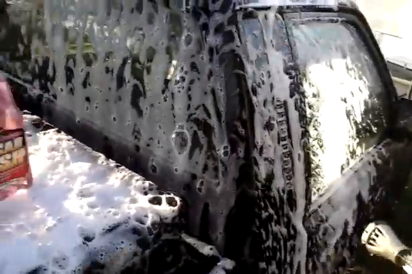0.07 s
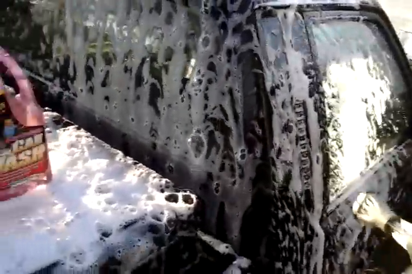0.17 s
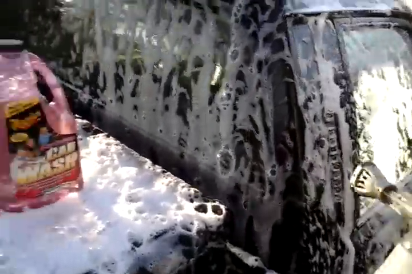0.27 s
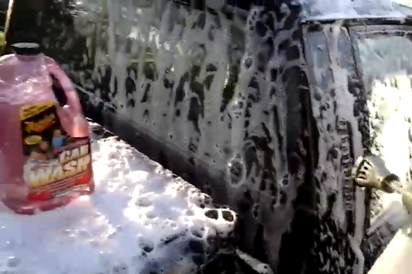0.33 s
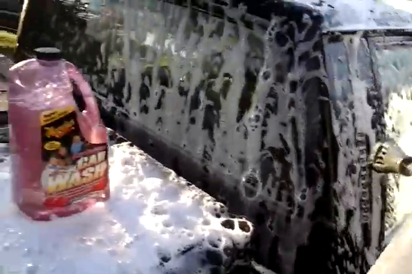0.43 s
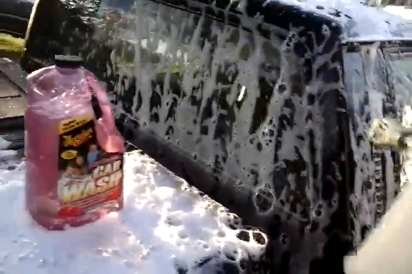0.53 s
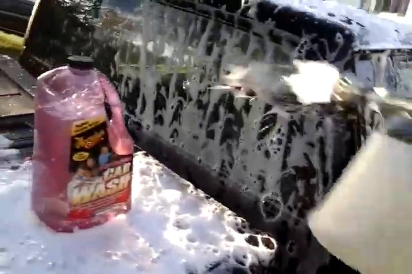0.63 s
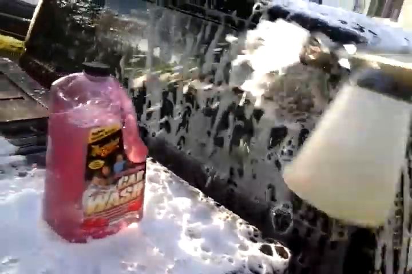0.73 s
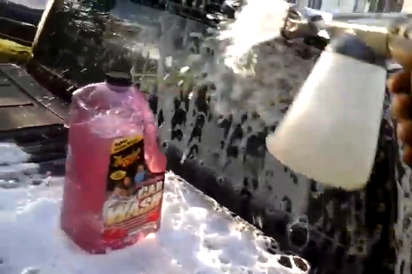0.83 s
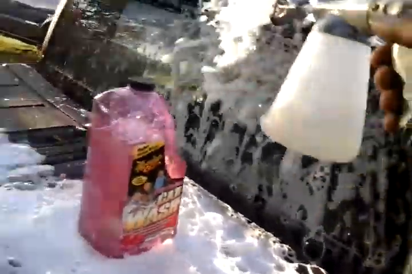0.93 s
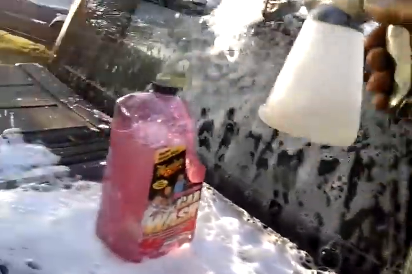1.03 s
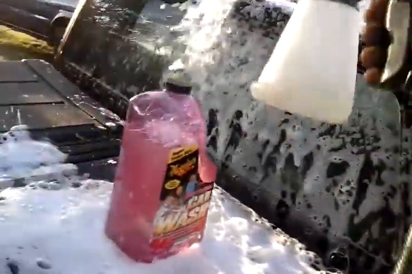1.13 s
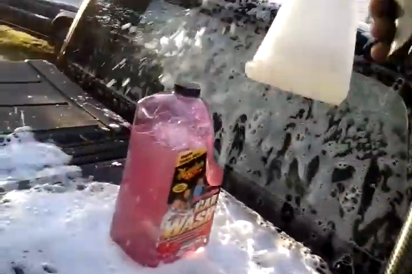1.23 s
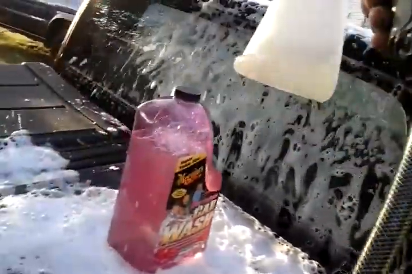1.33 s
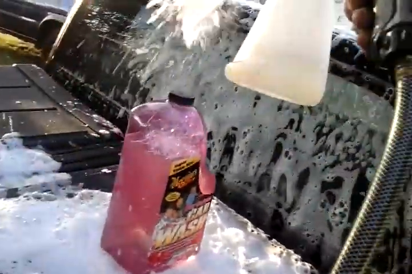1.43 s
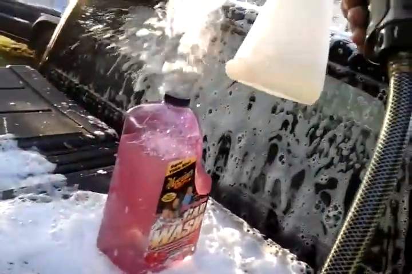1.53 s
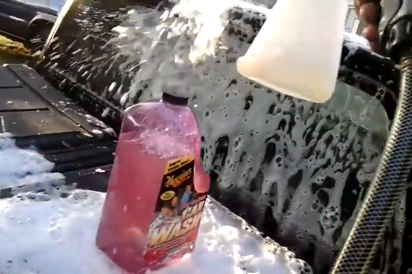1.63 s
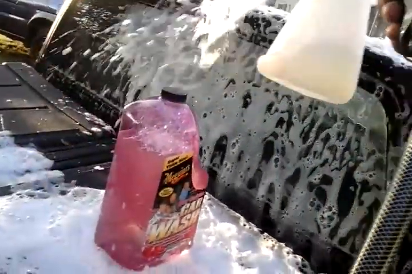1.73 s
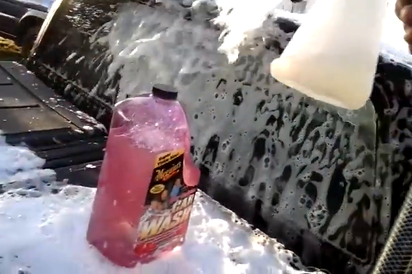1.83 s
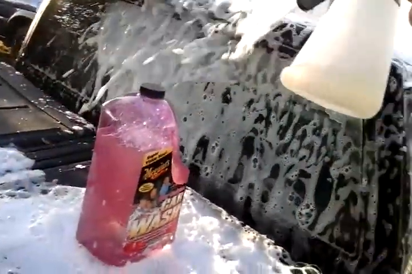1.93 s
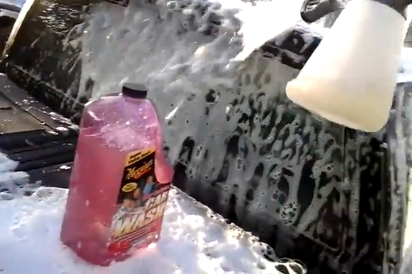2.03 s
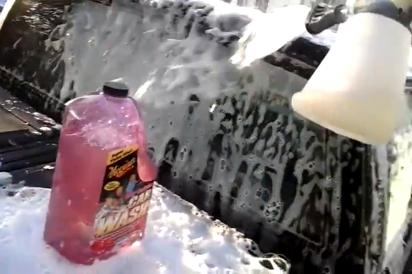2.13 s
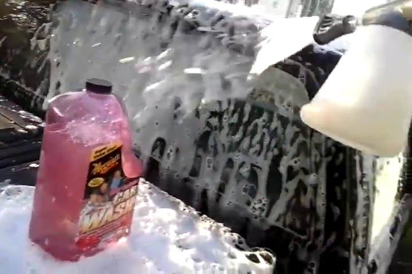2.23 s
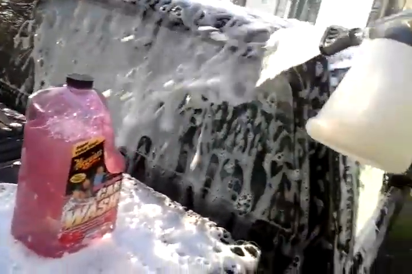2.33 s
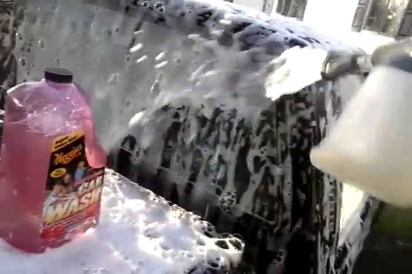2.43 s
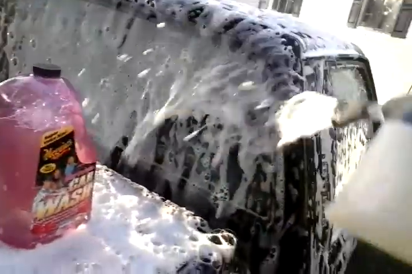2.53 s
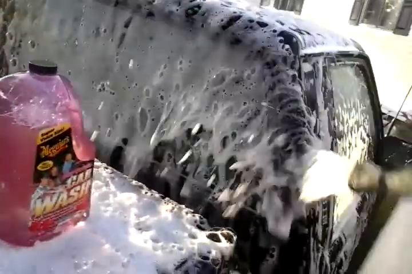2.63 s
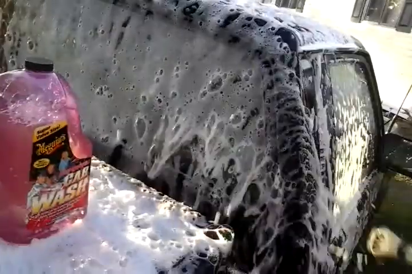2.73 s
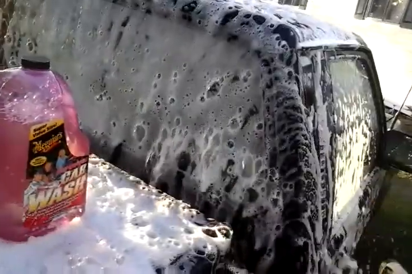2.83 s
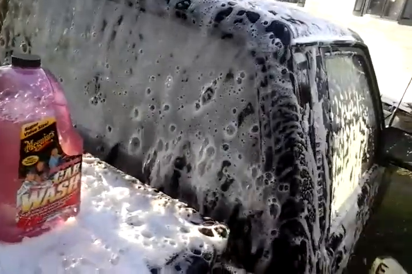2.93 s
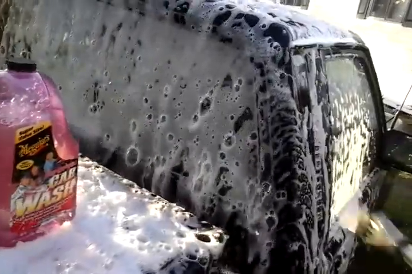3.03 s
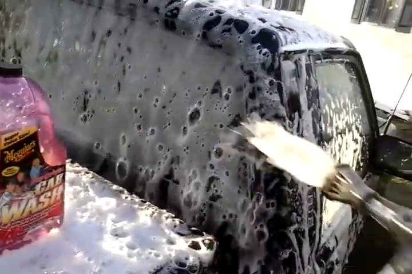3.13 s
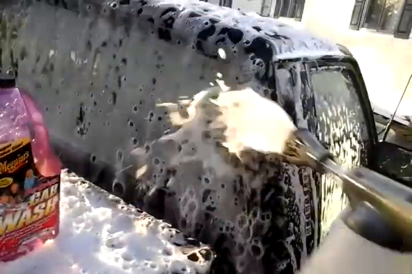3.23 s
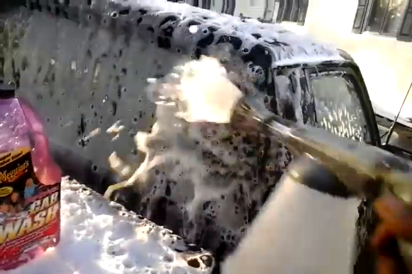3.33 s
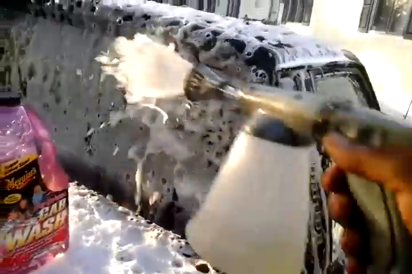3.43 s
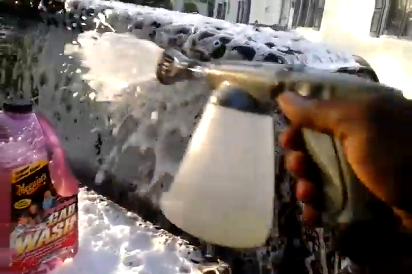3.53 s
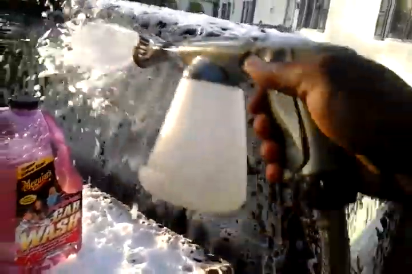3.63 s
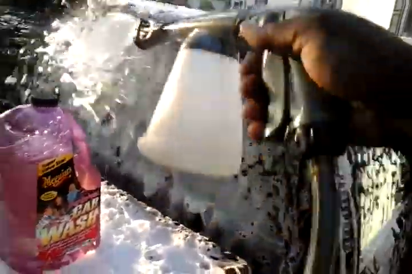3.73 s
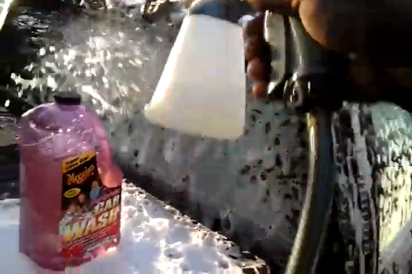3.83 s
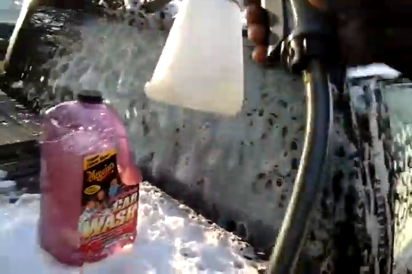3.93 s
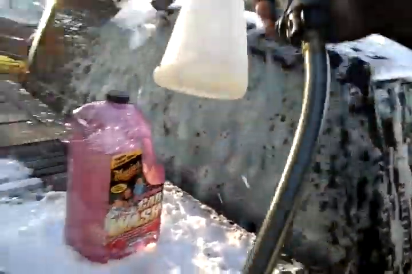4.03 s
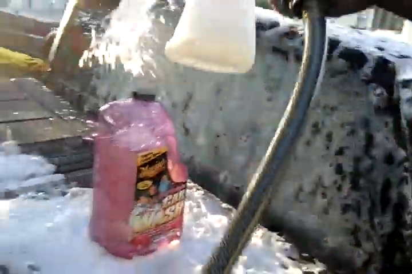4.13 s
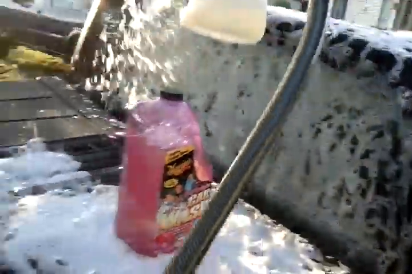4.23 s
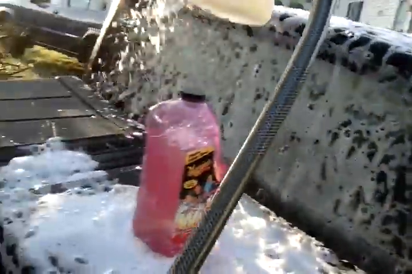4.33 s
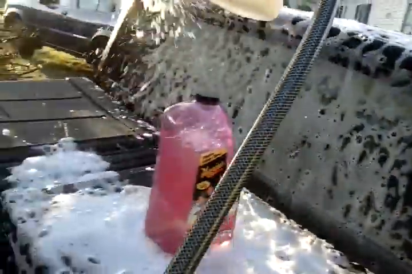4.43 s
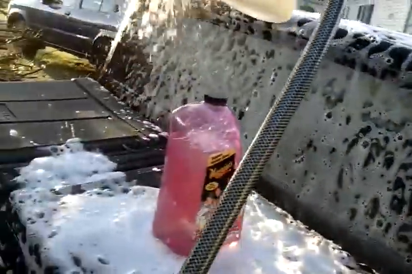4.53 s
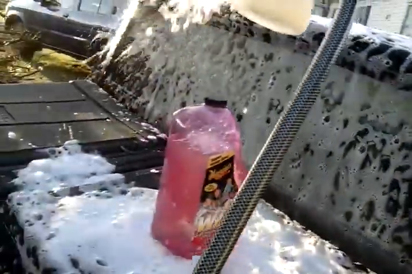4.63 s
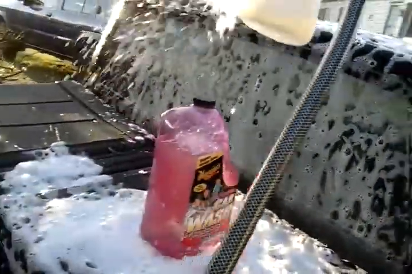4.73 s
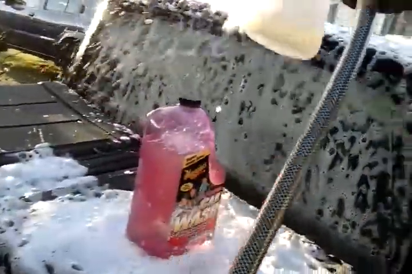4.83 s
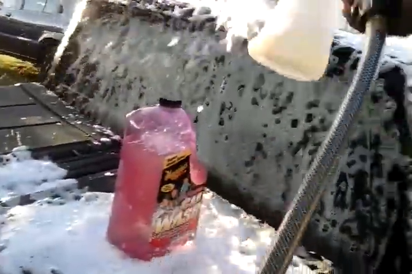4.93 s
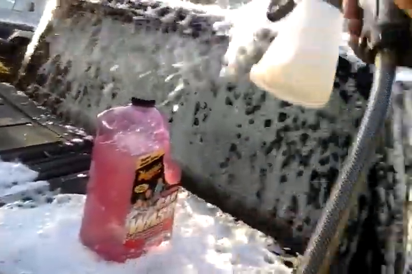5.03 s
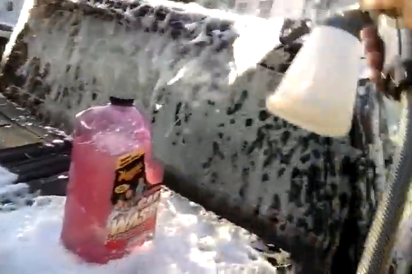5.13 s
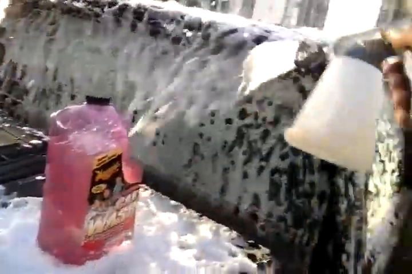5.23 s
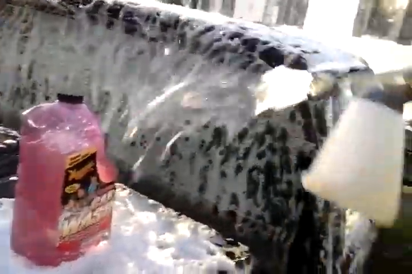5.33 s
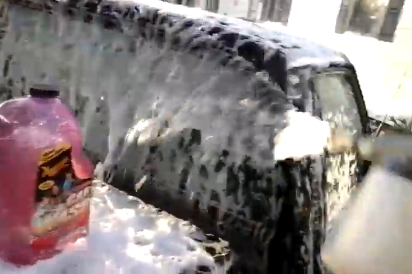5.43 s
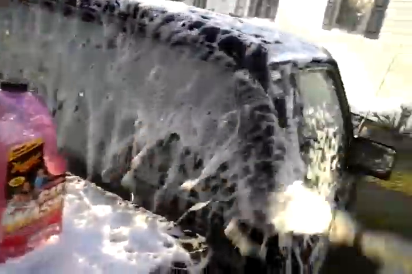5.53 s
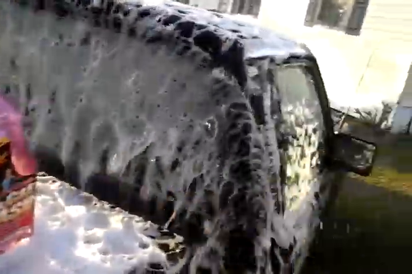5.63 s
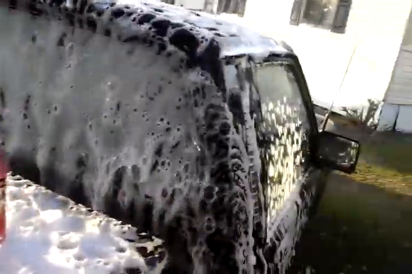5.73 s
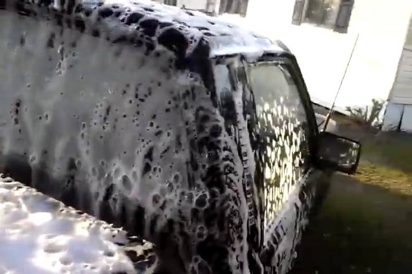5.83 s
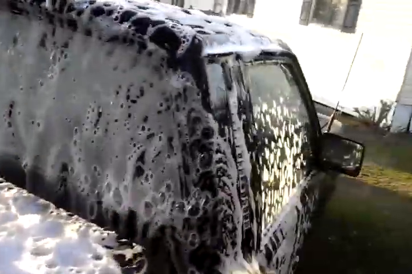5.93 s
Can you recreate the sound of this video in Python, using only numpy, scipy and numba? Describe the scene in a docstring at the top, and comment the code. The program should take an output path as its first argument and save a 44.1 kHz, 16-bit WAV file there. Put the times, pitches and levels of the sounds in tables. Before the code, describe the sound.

A foam gun on a hose sprays a vehicle outdoors. After a moment of soft fizzing suds, the trigger snaps, air spits out and a bright hiss begins, shifting in tone as the gun sweeps past. Four bursts, alternately short and long, start and stop with sharp clicks, and a fifth begins at the very end. Suds fizz and drip in the pauses, while a breeze thumps on the microphone, mostly on the left.

```python
"""A hose-end foam gun is squeezed five times beside a soapy vehicle, heard at two unlike microphone ports.
First, eddies of a breeze thump mostly on the left port while suds fizz and drip, and a thin whistle sounds.
At 0.6 s the valve snaps, ringing the gun's modes; the barrel spits air and the turbulent jet hisses,
its colour shifting by interference with a panel echo as the gun sweeps past. Suds fizz in each pause,
joined in the second by a faint hollow hiss. The fifth squeeze begins just before the end."""
import sys
import numpy as np
from scipy import signal
from scipy.io import wavfile
from numba import njit

SR = 44100
rng = np.random.default_rng(int(sys.argv[2]) if len(sys.argv) > 2 else 0)


def log_audio(samples):
    """Write samples as a 16-bit WAV file to the path given in sys.argv[1]."""
    # one column per channel
    frames = np.atleast_2d(samples).T
    # limit to full scale, then quantise
    limited = np.clip(frames, -1, 1)
    pcm = np.round(limited * 32767).astype(np.int16)
    wavfile.write(sys.argv[1], SR, pcm)


N = 263806
T = np.arange(N) / SR


def amp(db):
    """Decibels as an amplitude ratio."""
    return 10 ** (np.asarray(db) / 20)


def unit_rms(x):
    """Normalisation to unit power."""
    return x / np.sqrt(np.mean(x ** 2) + 1e-20)


def in_time(rows):
    """Linear interpolation of each column over the times in the first."""
    times_s, *columns = np.transpose(rows)
    return [np.interp(T, times_s, column) for column in columns]


def gate(start_s, end_s, rise_s, fall_s):
    """Trapezoidal envelope: rises from start_s, falls from end_s."""
    return np.clip(np.minimum((T - start_s) / rise_s, (end_s - T) / fall_s + 1), 0, 1)


def decay(start_s, fade_s):
    """Exponential decay from 1, silent before start_s."""
    return (T >= start_s) * np.exp(-np.abs(T - start_s) / fade_s)


def panned(pan_db):
    """Constant-power gains for a level difference, left minus right."""
    left = amp(np.atleast_1d(pan_db))
    return np.array([left, np.ones_like(left)]) * np.sqrt(2 / (1 + left ** 2))


def drift(corner_hz):
    """Low-pass random fluctuation of unit variance."""
    pole = np.exp(-40 * np.pi * corner_hz / SR)
    slow = signal.lfilter([1], [1, -2 * pole, pole * pole], rng.standard_normal(N // 20 + 2002))[2000:]
    return np.interp(np.arange(N) / 20, np.arange(len(slow)), unit_rms(slow - slow.mean()))


def band(x, low_hz, high_hz):
    """Butterworth band-pass."""
    return signal.sosfilt(signal.butter(2, [low_hz, high_hz], "band", fs=SR, output="sos"), x)


@njit
def resonate(x, hz, radius):
    """Two-pole resonator with a moving centre and unit peak gain."""
    out = np.zeros(len(x))
    for i in range(2, len(x)):
        feedback = 2 * radius * np.cos(2 * np.pi / SR * hz[i]) * out[i - 1] - radius ** 2 * out[i - 2]
        out[i] = (1 - radius ** 2) / 2 * (x[i] - x[i - 2]) + feedback
    return out


def lift(x, hz, width_hz, gain_db):
    """Resonant peak, or a dip if the gain is negative."""
    return x + (amp(gain_db) - 1) * resonate(x, hz * np.ones(N), np.exp(-np.pi * width_hz / SR))


def delayed(x, ms):
    """Propagation delay."""
    return np.interp(T - ms / 1000, T, x)


def ring(force, hz, t60_s):
    """Damped oscillator: a unit impulse starts a sine of height 1."""
    radius, step = amp(-60 / (t60_s * SR)), 2 * np.pi * hz / SR
    return signal.lfilter([0, np.sin(step)], [1, -2 * radius * np.cos(step), radius ** 2], force + 1e-18)


def coloured(white, spectrum, waver_db, tilt_db=lambda hz: 0):
    """Spectral shaping: two noises feed alternate quarter-octave bands, each wavering in level."""
    out, edges_hz = 0, 300 * 2 ** np.arange(0, 5.8, .25)
    points_hz, level_db = np.transpose(spectrum)
    for k, (low, high) in enumerate(zip(edges_hz, edges_hz[1:])):
        hz = np.sqrt(low * high)
        gain_db = np.interp(np.log(hz), np.log(points_hz), level_db) + tilt_db(hz) + waver_db * drift(3.2)
        out = out + np.repeat(amp(gain_db[::16]), 16)[:N] * band(white[k % 2], low, high)
    return out


def grains(per_s, spread_db, shape):
    """Shot noise: random impulses of uneven size and sign."""
    sizes = amp(spread_db * np.minimum(rng.exponential(1, shape), 5)) * rng.choice([-1, 1], shape)
    return unit_rms(sizes * (rng.random(shape) < per_s / SR))


def street():
    """Band-limited noise: the steady low rumble of the street."""
    return amp(-62) * unit_rms(band(rng.standard_normal((2, N)), 170, 1240))


# Spectrum of the fizz: frequency_hz, level_db
SUDS_SPECTRUM = [(300, -13), (700, -1.5), (1500, -0.5), (2500, -0.5), (4000, -2.5), (6000, -4.5),
                 (8000, -4), (10500, -10), (14500, -15)]
# Suds while the valve is shut (a negative fade swells): start_s, level_db, fade_db_per_s
PAUSES = [(0, -47, 26.5), (1.15, -46.5, -21), (2.73, -43.5, 21), (3.768, -41.5, 36), (5.59, -39, 105)]

def suds():
    """Shot noise of bursting bubbles over a soft hiss, louder as the last foam of a squeeze lands."""
    splash_db, rest_db, under_jet_db = 9, -57.5, -41.5
    bursts = amp(-2) * grains(per_s=900, spread_db=4, shape=(2, 2, N))
    fizz = coloured(bursts + rng.standard_normal((2, 2, N)), SUDS_SPECTRUM, waver_db=3)
    level_db = np.zeros(N)
    for start_s, start_db, fade_db_per_s in PAUSES:
        landing_db = splash_db * decay(start_s, .033) * (start_s > 0)
        level_db = np.where(T >= start_s, start_db - fade_db_per_s * (T - start_s) + landing_db, level_db)
    valve = valve_opening()
    return unit_rms(fizz) * ((1 - valve) * amp(np.maximum(level_db, rest_db)) + valve * amp(under_jet_db))


# Breeze over the left port: time_s, level_db
BREEZE = [(0, -37.5), (.12, -43), (.3, -64), (.6, -51), (.68, -22.5), (.97, -30.5), (1.3, -37.5),
          (1.45, -39.5), (1.95, -35.5), (2.06, -28), (2.68, -34), (2.82, -44), (3.15, -40), (3.36, -36),
          (3.42, -51), (3.62, -51), (3.73, -41), (4.1, -70), (4.3, -44.5), (4.55, -52.5), (4.85, -63),
          (5.1, -31.5), (5.25, -39.5), (5.4, -47), (5.65, -32), (5.85, -59), (5.98, -59)]

def wind():
    """Turbulent pressure, independent at each port; every buffet leaves a wake on the left."""
    wake_db, wake_s, sharp_db_per_octave = -6, .03, 10
    start_s, buffet_db, pitch_hz = np.transpose(BUFFETS)
    kicks, onsets = np.zeros((2, N)), (start_s * SR).astype(int)
    kicks[0, onsets] = amp(buffet_db + wake_db)
    # quicker buffets leave sharper wakes
    kicks[1, onsets] = kicks[0, onsets] * amp(sharp_db_per_octave * np.log2(pitch_hz / 200))
    wakes = signal.lfilter([1], [1, -np.exp(-1 / (wake_s * SR))], kicks)
    left, left_sharp = np.hypot(amp(in_time(BREEZE)[0]), wakes)
    right = amp(-54.5 + 2.5 * drift(4.2))    # the sheltered port
    level, sharp_level = np.array([left, right]), np.array([left_sharp, right])
    lumps, white = np.array([drift(52), drift(55)]), rng.standard_normal((3, 2, N))
    thump = level * unit_rms(band(white[0], 100, 317) * amp(3.9 * lumps))
    sharp = sharp_level * unit_rms(band(white[1], 280, 674) * amp(5.9 * lumps))
    sway = np.hypot(amp(-57.5 + 3.6 * drift(8)), amp(-10.5) * level)
    heave = sway * unit_rms(band(white[2], 37, 105))
    return thump + amp(-14) * sharp + heave


# Hardest blows of the wind on the left port: start_s, level_db, pitch_hz
BUFFETS = [(0.086, -31, 158), (0.671, -13.5, 304), (0.72, -17.5, 170), (0.759, -21, 209), (0.811, -25, 164),
           (0.879, -25, 163), (0.902, -12, 377), (0.949, -21, 223), (1.028, -21, 142), (1.059, -23, 364),
           (1.115, -24.5, 106), (1.198, -40, 248), (1.514, -22, 275), (1.607, -29, 151),
           (1.687, -15.5, 191), (1.719, -21, 230), (1.757, -23, 187), (1.979, -29, 114), (2.019, -14, 326),
           (2.264, -20, 183), (2.344, -30, 205), (2.388, -29.5, 109), (2.439, -37, 213), (2.483, -25, 183),
           (2.574, -21, 182), (2.632, -20.5, 160), (2.965, -20.5, 200), (3.139, -28, 127),
           (3.212, -23, 193), (3.324, -24, 370), (3.35, -27, 182), (5.062, -26, 121), (5.108, -25.5, 135),
           (5.205, -31, 143), (5.479, -28, 230), (5.528, -25.5, 94.2), (5.62, -22, 236),
           (5.689, -24.5, 159), (5.751, -31, 148), (5.924, -29, 195)]

def buffets():
    """Transient response: each blow gives the left diaphragm a heavily damped swing."""
    out = np.zeros((2, N))
    for (start_s, level_db, pitch_hz), sign in zip(BUFFETS, rng.choice([-1, 1], len(BUFFETS))):
        cycles, at = T[:SR // 20] * pitch_hz, round(start_s * SR)
        envelope = 4.28 * amp(level_db) * cycles * np.exp(-1.3 * cycles)
        out[0, at:at + len(cycles)] += sign * envelope * np.sin(2 * np.pi * cycles)
    return out


# Single drops landing: start_s, peak_db, pitch_hz, pan_db
DROPS = [(0.1274, -27, 3540, 11), (0.2942, -46.5, 5840, 6), (0.3461, -39, 5720, 4.5),
         (1.2194, -31, 5840, 14), (2.989, -27, 4050, 11), (3.8346, -28, 5360, 3), (3.93, -32, 5090, -3),
         (3.9594, -45, 4780, 3), (5.7215, -27, 4700, 3), (5.886, -18, 7200, 7), (5.8906, -33, 5850, 7)]

def drops():
    """Impact noise: each drop is a short splat, strongest around its pitch."""
    out, length = np.zeros((2, N)), round(.012 * SR)
    for start_s, peak_db, pitch_hz, pan_db in DROPS:
        impact = rng.standard_normal((2, length)) * np.exp(-T[:length] / .0009)
        splat = band(impact, .66 * pitch_hz, 1.13 * pitch_hz) + amp(-15.5) * band(impact, 2000, 12000)
        at = round(start_s * SR)
        out[:, at:at + length] += amp(peak_db) * splat / np.abs(splat).max() * panned(pan_db)
    return out


# Faint whistle before the first squeeze: time_s, pitch_hz, level_db
WHISTLE = [(0.47, 7214, -71), (0.484, 7330, -59), (0.53, 6900, -58), (0.6, 7200, -64.5)]

def whistle():
    """Random frequency and amplitude modulation make a thin tone breathy."""
    pitch_hz, level_db = in_time(WHISTLE)
    tone = np.sin(2 * np.pi * np.cumsum(pitch_hz + 60 * drift(120)) / SR)
    envelope = amp(level_db + 3 * drift(43)) * gate(WHISTLE[0][0], WHISTLE[-1][0], .01, .005)
    return tone * envelope * panned(4)


# Modes of the gun: pitch_hz, level_db, t60_s
GUN_MODES = [(1340, -18, .01), (2330, -3, 0.024), (2506, 6, 0.012), (3140, 0.5, 0.019), (4940, 7.5, 0.0063),
             (5610, 3, 0.0099), (7000, -8, .006), (8850, -16, .006), (11300, -22, .005)]
# Valve and trigger snaps: start_s, peak_db, favoured_hz, upper_modes_db, pan_db
SNAPS = [(0.599, -30, 2250, -20, 10), (0.6078, -10, 3250, -12, 11), (1.137, -20, 2240, -9, 17.5),
         (1.1422, -3.5, 2500, -13.5, 1.5), (1.348, -25, 2280, -8, 17), (2.7134, -33, 2000, -7, -10.5),
         (2.7202, -7.5, 2280, 0, 6), (3.0881, -6, 2500, -24, 8), (3.0914, -9.5, 2920, -15, -1),
         (3.17, -7, 3070, 0, -2), (3.176, -15, 2440, 2, 9.5), (3.7607, -15, 2830, -1, 28.5),
         (3.7662, -10.5, 3000, 3, -18), (4.023, -25, 2960, 4, 14), (5.5841, -8, 2970, 2, 0),
         (5.94, -4.5, 3200, -4, -1.5)]

def snaps():
    """Modal ringing: a brief rattle excites the gun, its lower modes most near the favoured pitch."""
    out, length, left_lag = np.zeros((2, N)), round(.03 * SR), 13    # samples
    for start_s, peak_db, favoured_hz, upper_db, pan_db in SNAPS:
        rattle = band(rng.standard_normal(length) * np.exp(-T[:length] / .00061), 980, 15500)
        snap = 0
        for hz, mode_db, t60_s in GUN_MODES:
            drive_db = upper_db if hz > 4000 else -28 * abs(np.log2(hz / favoured_hz))
            snap = snap + amp(mode_db + drive_db) * ring(rattle, hz, t60_s)
        at = round(start_s * SR)
        snap = (amp(peak_db) * snap / np.abs(snap).max())[:N - at - left_lag]
        for port, onset, gain in zip(out, (at + left_lag, at), panned(pan_db)):
            port[onset:onset + len(snap)] += gain * snap
    return out


# Air spat out as water arrives: start_s, level_db, hold_s
SPITS = [(0.601, -25.5, .045), (3.085, -25.5, .006), (5.932, -37, .05)]

def spits():
    """Filtered shot noise: dense crackles ring in the barrel."""
    fade_db_per_s = 600
    crackle = grains(per_s=2800, spread_db=4.9, shape=N)
    barrel = unit_rms(band(crackle, 1550, 3530) + amp(-8) * band(crackle, 2700, 10000))
    envelope = 0
    for start_s, level_db, hold_s in SPITS:
        attack = np.clip((T - start_s) / .0032, 0, 1)
        envelope = envelope + attack * amp(level_db - fade_db_per_s * np.maximum(T - start_s - hold_s, 0))
    return paths(barrel * envelope) * amp([[0], [-4]])


# Squeezes of the trigger: open_s, close_s, rise_s, surge_db
SQUEEZES = [(0.604, 1.142, 0.035, 9), (1.348, 2.72, 0.018, 2), (3.089, 3.764, .022, 4.5),
            (4.028, 5.579, .014, 0.5), (5.94, 6.202, 0.019, 0)]

def valve_opening():
    """The valve gates the flow: 0 shut, 1 open."""
    return sum(gate(open_s, close_s, rise_s, fall_s=.012) for open_s, close_s, rise_s, _ in SQUEEZES)


# Spectrum of the jet: frequency_hz, density_db
JET_SPECTRUM = [(300, -19), (600, -1.5), (1000, -5), (1800, -7), (2500, 1.5), (4000, -2.5), (5500, 0.5),
                (6700, -5.5), (7500, -12), (10000, -8), (12000, -11), (13300, -38), (14400, -7.5)]
# Resonances of the nozzle: centre_hz, width_hz, gain_db
NOZZLE_RESONANCES = [(2980, 380, 5), (6700, 350, 6), (8400, 280, 5), (11200, 500, 3), (14300, 500, 4)]
# The gun sweeps away and back: time_s, level_db, left_lag_ms, bright_hz, hollow_hz, low_mids_db
SWEEP = [(.6, -47, 0.14, 5670, 3300, 3.5), (.75, -43.5, 0.096, 6020, 3400, 3.5),
         (1.1, -47.5, 0.03, 5770, 3900, 2.5), (1.35, -44.5, 0.0069, 4900, 3900, 2),
         (1.65, -46.5, -0.0073, 5060, 3900, 4), (2.03, -44, 0.015, 4970, 3830, 1.5),
         (2.36, -46, 0.075, 5370, 3600, 0.5), (2.7, -46.5, 0.18, 5070, 3440, 2.5),
         (3.1, -37.5, 0.14, 5550, 3100, 1.5), (3.3, -40, 0.091, 6000, 3230, 1),
         (3.75, -47, -0.036, 5500, 3600, 4), (4.05, -43, -0.14, 5370, 4150, 0),
         (4.37, -45.5, -0.16, 4920, 4270, 0), (4.63, -48.5, -0.066, 5120, 4560, 1.5),
         (4.97, -50, -0.069, 5550, 4460, 4), (5.2, -47.5, 0.059, 4800, 4000, 5.5),
         (5.55, -43.5, 0.13, 5500, 3550, 1.5), (5.98, -38.5, 0.27, 5370, 3300, 1)]

def jet():
    """Turbulent noise, coloured by the nozzle, reaches the ports directly and by scattering."""
    level_db, lag_ms, bright_hz, hollow_hz, low_db = in_time(SWEEP)
    # the flow opens with a surge and a dull gulp, and spurts as the valve shuts
    surge_db = sum(db * np.exp(-np.abs(T - open_s - rise_s) / .05) for open_s, _, rise_s, db in SQUEEZES)
    gulp_db = 9.5 * sum(decay(open_s, .012) for open_s, *_ in SQUEEZES)
    spurt_db = 4 * sum(np.exp(-np.abs(T - close_s) / .012) for _, close_s, *_ in SQUEEZES)
    low_db = low_db + gulp_db + spurt_db
    treble_db = -1 + 14 * lag_ms + spurt_db

    def tilt_db(hz):
        """Shelving gains below and above the middle of the hiss."""
        return np.clip((4500 - hz) / 1000, 0, 1) * low_db + np.clip((hz - 6800) / 1500, 0, 1) * treble_db

    white = rng.standard_normal((2, 3, N)) * amp(.83 * drift(94) + drift(7.3))    # foam tears unevenly
    parts = coloured(white, JET_SPECTRUM, waver_db=1.1, tilt_db=tilt_db)
    for hz, width_hz, gain_db in [*NOZZLE_RESONANCES, (hollow_hz, 450, 3.5)]:
        parts = [lift(part, hz, width_hz, gain_db) for part in parts]
    direct = parts[0] - .25 * delayed(parts[0], ms=1.15)    # echo off the hand and bottle
    diffuse = np.array(parts[1:])
    scattered = amp(-10) * diffuse + amp(6) * band(diffuse, 3840, 22000)
    left, right = paths(direct) + scattered
    # the bright band follows the aim
    pair = np.array([lift(left, bright_hz, 500, .53), lift(right, bright_hz, 520, 7.3)])
    mid_rms = np.sqrt(np.mean(band(direct, 4425, 5700) ** 2))
    envelope = amp(level_db + surge_db + spurt_db) * valve_opening()
    return pair / mid_rms * envelope * panned(4 - lag_ms)


def paths(x):
    """Comb filtering by an opposed panel echo; the left port is inverted and hears an edge echo too."""
    lag_ms = in_time(SWEEP)[1]
    left_panel = .45 * delayed(x, lag_ms + .547 + .03 * lag_ms)
    left_edge = .6 * delayed(x, lag_ms + .3)
    right_panel = .65 * delayed(x, .629 + .43 * lag_ms)
    return np.array([left_panel + left_edge - delayed(x, lag_ms), x - right_panel])


# Puffs of air: start_s, level_db, fade_s, pan_db
PUFFS = [(1.345, -21, 0.032, -7.5), (2.725, -39, 0.043, -2), (4.247, -22.5, 0.044, 4),
         (5.235, -38, .04, -3)]

def puffs():
    """Decaying noise: short low puffs of air, heard in both channels with opposite polarity."""
    out, eddies = np.zeros((2, N)), unit_rms(band(rng.standard_normal(N), 170, 720))
    for start_s, level_db, fade_s, pan_db in PUFFS:
        envelope = np.clip((T - start_s) / .0032, 0, 1) * decay(start_s, fade_s)
        out += amp(level_db) * eddies * envelope * panned(pan_db) * [[-1], [1]]
    return out


# Bands of the hollow hiss: centre_hz, width_hz, level_db
HISS_BANDS = [(2460, 1500, -3), (3950, 300, 0), (6300, 1900, -3.5), (8900, 560, -13)]

def hollow_hiss():
    """Formant-like bands of noise sound hollow, mostly on the left, through the second pause."""
    white = rng.standard_normal(N)
    hiss = sum(amp(db) * unit_rms(band(white, hz - width / 2, hz + width / 2))
               for hz, width, db in HISS_BANDS)
    return hiss * amp(-47) * gate(2.5, 3.08, rise_s=.089, fall_s=.013) * amp([[0], [-12]])


def ports(pair):
    """Port resonance: the right one rings, with a slight dip just below its peak."""
    right = lift(pair[1], hz=5550, width_hz=1500, gain_db=10)
    return np.array([pair[0], lift(right, hz=4000, width_hz=570, gain_db=-1)])


def scene():
    """Superposition: gun and foam pass through the port response; wind and street add directly."""
    top_hz = 14900
    spray = signal.sosfilt(signal.cheby2(10, 50, top_hz, fs=SR, output="sos"), jet() + suds())
    washing = spray + spits() + snaps() + drops() + whistle() + hollow_hiss()
    return ports(washing) + wind() + street() + buffets() + puffs()


def record(dry):
    """Hard clipping at full scale, then a steep low-pass."""
    stop_hz = 16000
    return signal.sosfilt(signal.cheby2(12, 70, stop_hz, fs=SR, output="sos"), np.clip(dry, -1, 1))


dry = scene()
out = record(dry)
log_audio(out)
```